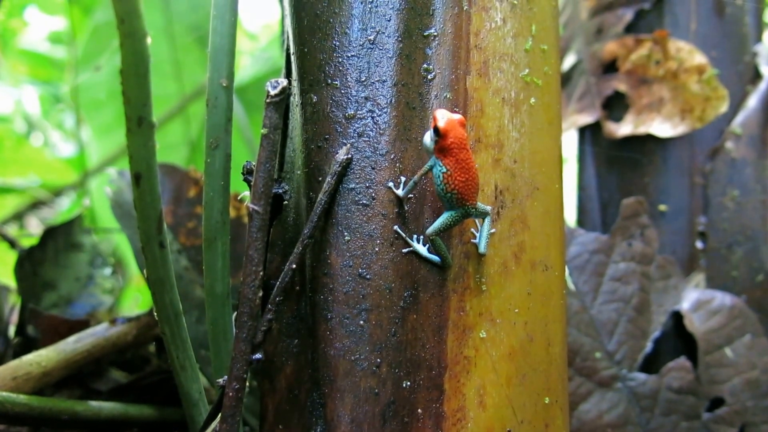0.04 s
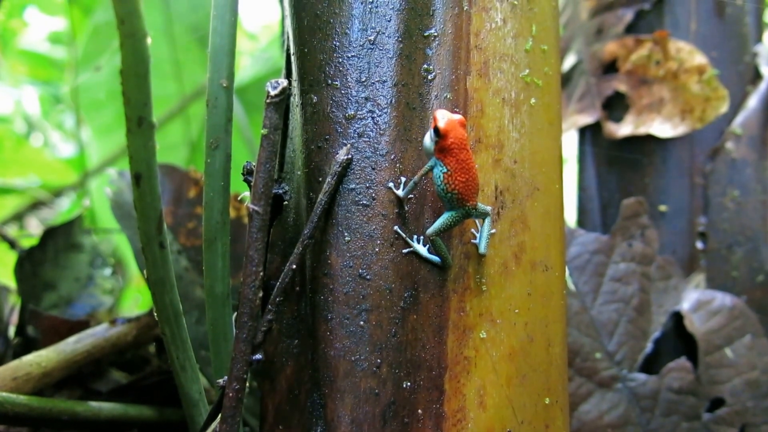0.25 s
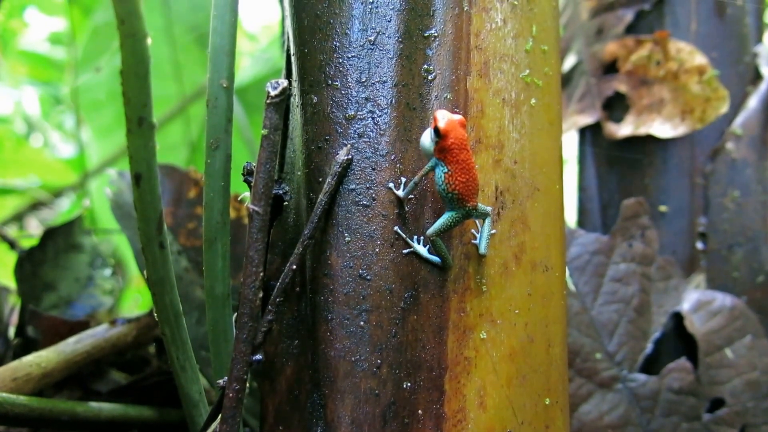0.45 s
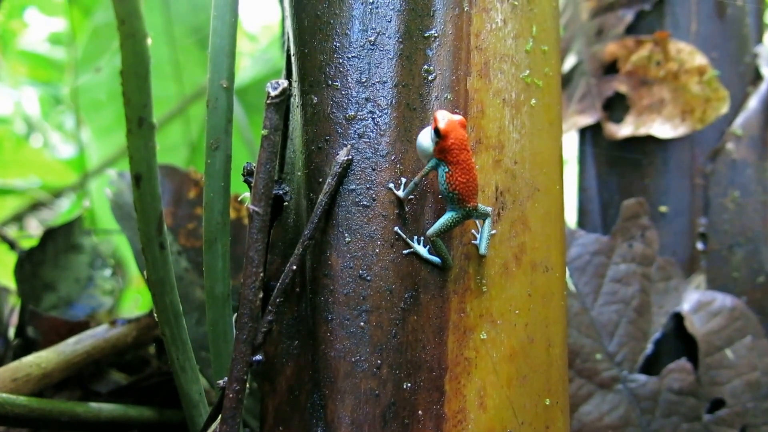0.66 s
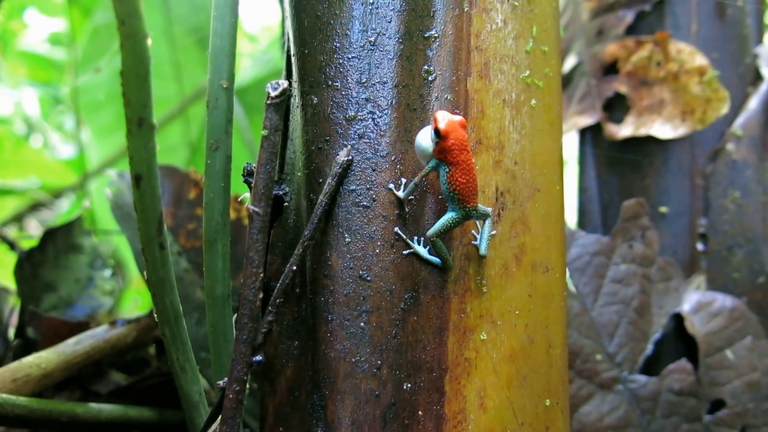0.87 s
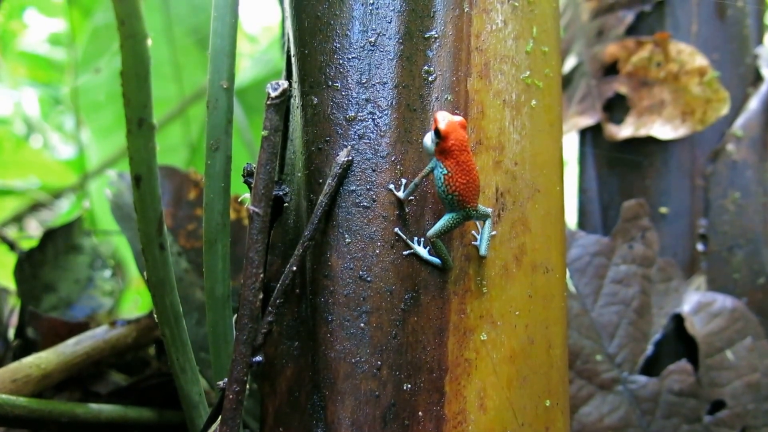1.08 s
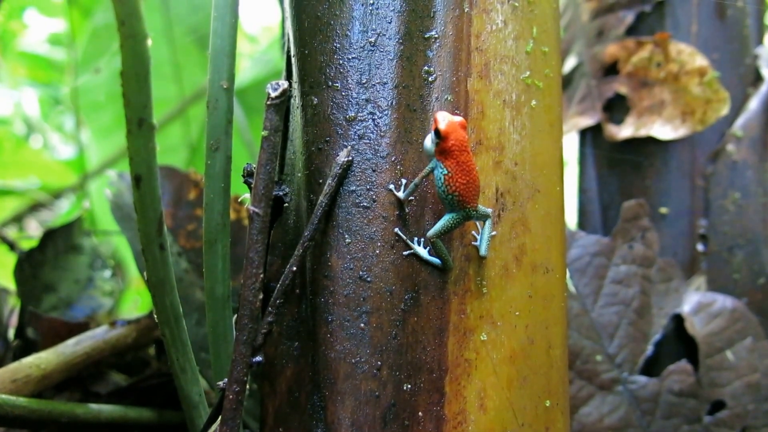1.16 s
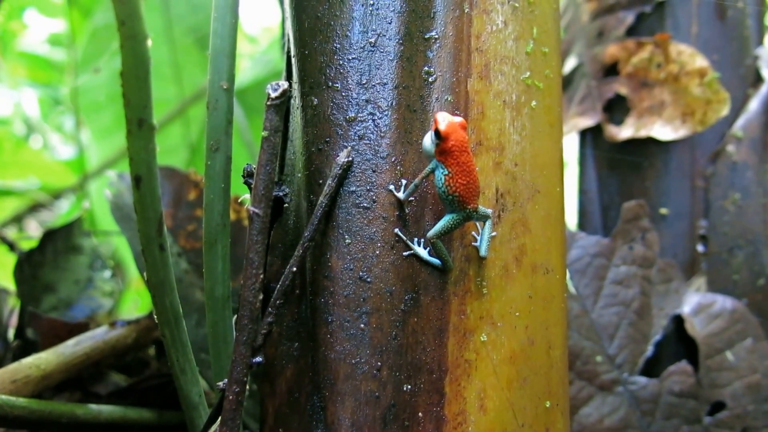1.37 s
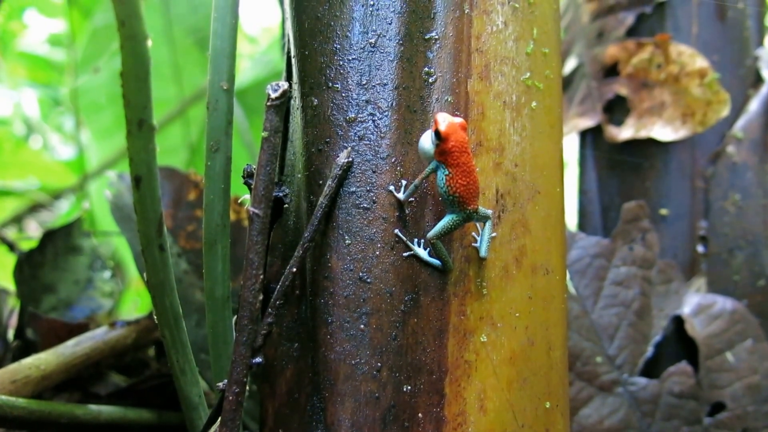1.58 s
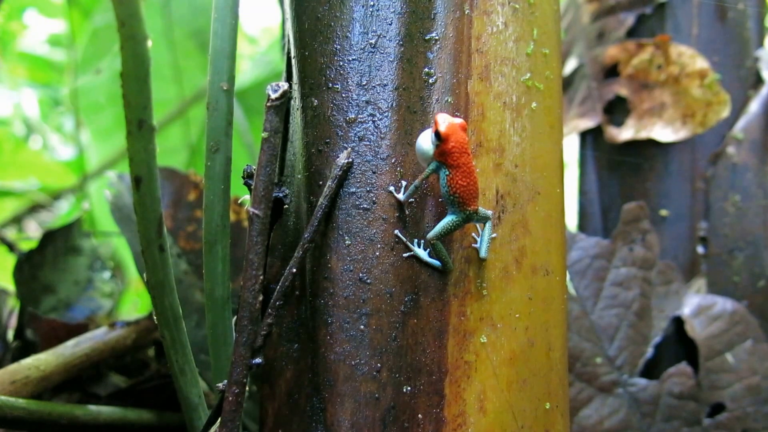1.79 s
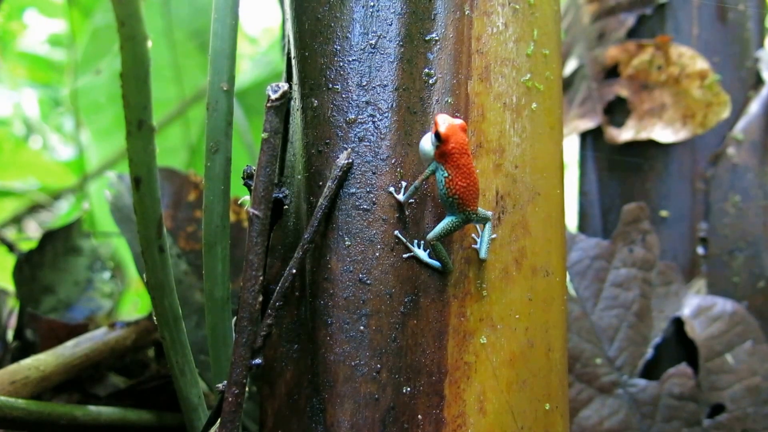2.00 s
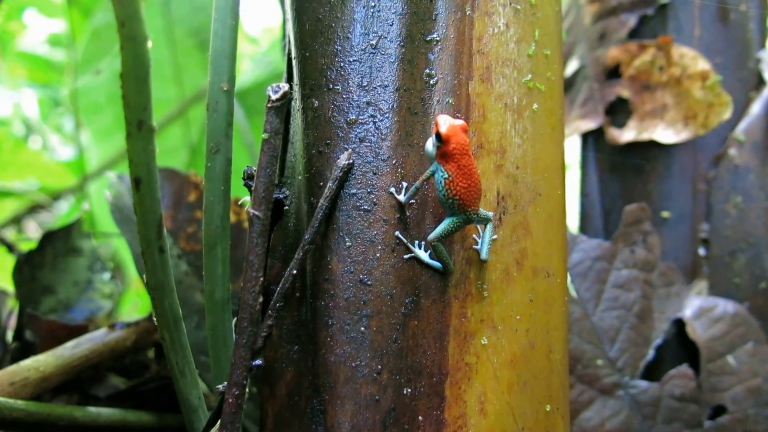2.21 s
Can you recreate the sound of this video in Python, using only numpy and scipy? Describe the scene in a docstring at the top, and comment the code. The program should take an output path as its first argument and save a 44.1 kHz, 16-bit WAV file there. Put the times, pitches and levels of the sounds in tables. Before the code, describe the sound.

A small frog trills close by, from about 0.2 to 0.9 seconds. The call opens with a few soft ticks, quickens into a high buzz that grows louder and rises in pitch, then ends in a brief flutter. After a pause, a nearly identical trill runs from about 1.3 to 1.9 seconds. A soft, steady wash of distant forest noise lies underneath throughout.

```python
"""In a forest, a small frog on a plant stem gives two buzzy trills over a steady, distant wash.
Each trill is about ninety snaps of the larynx that ring the vocal sac; as the sac fills, the ring
grows louder, higher and longer. Leaves scatter faint echoes around the frog, and an automatic
gain control ducks the mix on the loudest snaps, so the wash dips and creeps back."""
import sys
import numpy as np
from scipy import signal
from scipy.io import wavfile
from scipy.ndimage import uniform_filter1d

SR = 44100
rng = np.random.default_rng(int(sys.argv[2]) if len(sys.argv) > 2 else 0)


def log_audio(samples):
    """Write samples as a 16-bit WAV file to the path given in sys.argv[1]."""
    # one column per channel
    frames = np.atleast_2d(samples).T
    # limit to full scale, then quantise
    limited = np.clip(frames, -1, 1)
    pcm = np.round(limited * 32767).astype(np.int16)
    wavfile.write(sys.argv[1], SR, pcm)


N = 99225

# tone of the forest bed (frequency [Hz], relative level [dB])
WASH_EQ = [(25, -44), (45, -58), (80, -9.5), (130, -2), (180, -0.4), (240, -3), (400, 0.9), (540, 0.84),
           (850, -2.5), (1200, -5), (1750, -5.5), (2250, -9.5), (2850, -14.5), (4300, -14.5), (6000, -15.5),
           (7200, -19), (11000, -21), (14300, -24), (15600, -26.5)]
# how mono the bed is (frequency [Hz], left-right correlation [0-1])
WASH_MONO = [(30, .8), (80, 0.92), (290, 0.95), (640, 0.84), (1410, 0.55), (3100, 0.67), (6800, 0.27),
             (15000, .04)]
# lean of the bed (frequency [Hz], left minus right [dB])
WASH_PAN = [(60, -2), (250, 1.1), (640, 0.9), (1400, 2.5), (3100, 1), (6500, -1), (9000, -1.5), (11000, -1),
            (12500, -3), (14300, 7), (15600, -3)]
# slap off the nearest leaf (delay [s], level [dB])
LEAF_ECHOES = [(.0049, -19)]
# pace of each trill: slow ticks, buzz, slackening, last flutter (time [s], rate [snaps/s])
RATE_1 = [(0.208, 42), (0.234, 38), (0.281, 133), (0.33, 141), (0.37, 163), (0.41, 149), (0.511, 164),
          (0.538, 181), (0.618, 158), (0.754, 143), (0.842, 103), (0.864, 262)]
RATE_2 = [(1.255, 47), (1.285, 40), (1.301, 88), (1.382, 146), (1.42, 151), (1.467, 148), (1.525, 162),
          (1.619, 173), (1.659, 158), (1.797, 140), (1.894, 105), (1.917, 257)]
# the two calls (rate curve [table], trim [dB], ring pitch shift [Hz])
TRILLS = [(RATE_1, -1.4, 0), (RATE_2, -1.1, 40)]
# swell and rise of a trill (time since first snap [s], effort [dB], ring pitch [Hz])
TRILL_SHAPE = [(0, -12.5, 3280), (.06, -11, 3340), (.17, -5.5, 3490), (.27, -2, 3670), (.345, -0.75, 3856),
               (.45, 1.92, 3986), (.6, 3, 4150), (.66, 2.5, 4140)]
# tone of throat and body (frequency [Hz], gain [dB])
BODY_EQ = [(500, -28), (2400, -15), (2900, -9), (3250, -1), (3500, 1), (3800, .6), (4200, 0), (4550, -1.5),
           (5100, -4.5), (5700, 2.2), (6100, -7), (6600, -1.8), (7200, -4), (8000, -1), (9500, -6.5),
           (12000, -10.5), (16000, -16)]
# placement of the frog (frequency [Hz], left minus right [dB])
FROG_PAN = [(3000, -10), (4000, 4.5), (4700, -4), (5600, 1.5), (6400, -7), (8000, -3), (10700, -9),
            (13000, -28)]

WASH_DB, PATCH_DB = -26.5, 0.86
LEAVES_DB, LEAVES_T60_S, LEAVES_DELAY_S = -14.5, .06, .0015
SNAP_T60_S, FILL_S = 0.0057, 0.41  # decay of a snap; time for the sac to fill
SOFT_ONSET_S, EASE_S = 0.00012, .08  # softer attacks until the sac is full, and as the frog eases off
HUM_DB, HUM_SPREAD_DB, HUM_S = -11, -2, .0044  # the taut sac hums on after a snap
SLACK_DB_PER_S = 61  # the hum fades as the sac slackens
OVERTONE_HZ, OVERTONE_FOLLOW = 9650, 1.7  # starting pitch; Hz gained per Hz that the ring rises
OVERTONE_DB, OVERTONE_T60_S, OVERTONE_GROWTH = -26, 0.011, 0.34  # growth: dB per dB of effort
CLOSE_S, CLOSE_DB = 0.039, -12  # the last snaps fade
JITTER_DB, JITTER_HZ, JITTER_S = 0.49, 24.3, .00006  # from snap to snap
THRESHOLD_DB, RECOVER_DB_PER_S, START_DUCK_DB, DUCK_S = -4, 4, 3, 0.014
HIGH_CUT_HZ = 15700
RING_T = np.arange(900) / SR  # time axis of one snap


def amp(db):
    """Decibels to gain."""
    return 10 ** (np.asarray(db) / 20)


def unit(x):
    """Scales to rms 1."""
    return x / np.sqrt(np.mean(x ** 2) + 1e-20)


def curve(points, hz):
    """Reads a spectrum table on a log-frequency axis."""
    f, value = np.transpose(points)
    return np.interp(np.log(hz + 1), np.log(f + 1), value)


def add(mix, s, sound):
    """Mixes a sound in at s seconds."""
    part = mix[max(round(s * SR), 0):][:len(sound)]
    part += sound[:len(part)]


def equalise(x, gain_db, size=2048):
    """Minimum-phase EQ whose gain in dB is a function of frequency."""
    log_gain = np.log(amp(gain_db(abs(np.fft.fftfreq(size, 1 / SR)))))
    taps = np.fft.ifft(np.exp(np.conj(signal.hilbert(log_gain)))).real
    return signal.oaconvolve(x, taps[:size // 2])[:N]


def forest_wash():
    """Distant forest noise with faint drifting patches, near mono in the bass and wide in the treble."""
    frames, hz = N // 256 + 5, np.fft.rfftfreq(1024, 1 / SR)
    a, b, c, d, patches = rng.standard_normal((5, frames, len(hz)))
    patches = uniform_filter1d(patches, size=14, axis=0)  # smooth in time
    patches = unit(uniform_filter1d(patches, size=12, axis=1))  # and in frequency
    mono = curve(WASH_MONO, hz)
    left = a + 1j * b
    right = mono * left + np.sqrt(1 - mono ** 2) * (c + 1j * d)
    pan = amp(curve(WASH_PAN, hz) / 2)
    spectra = np.array([left * pan, right / pan]) * amp(curve(WASH_EQ, hz) + PATCH_DB * patches)
    noise = signal.istft(spectra.transpose(0, 2, 1), nperseg=1024, noverlap=768)[1][:, :N]
    return amp(WASH_DB) * unit(noise)


def leaf_scatter(x, size=6000):
    """Leaves add one close slap and a short diffuse tail that differs in each ear."""
    t = np.arange(size) / SR
    tail = rng.standard_normal((2, size)) * np.exp(-np.log(1000) * t / LEAVES_T60_S)
    tail *= t > LEAVES_DELAY_S
    taps = amp(LEAVES_DB) * tail / np.linalg.norm(tail, axis=1, keepdims=True)
    taps[:, 0] += 1  # direct sound
    for delay, db in LEAF_ECHOES:
        taps += amp(db) * np.sinc((t - delay) * SR)
    return signal.fftconvolve(x, taps, axes=1)[:, :N]


def ring(hz, t60):
    """One struck mode, dying by 60 dB in t60 seconds."""
    return np.sin(2 * np.pi * hz * RING_T) * np.exp(-np.log(1000) * RING_T / t60)


def sac_hum(hz):
    """The taut sac hums in a brief swell that lengthens the ring."""
    swell = np.hanning(int(HUM_S * SR))
    return np.pad(swell, (0, len(RING_T) - len(swell))) * np.sin(2 * np.pi * hz * RING_T)


def trill(rate, trim_db, shift_hz):
    """A train of larynx snaps; each sets off the sac's ring, its hum and a faint overtone."""
    at, per_s = np.transpose(rate)
    t = np.arange(at[0], at[-1], 1 / SR)
    count = np.cumsum(np.interp(t, at, per_s)) / SR
    times = np.interp(np.arange(int(count[-1]) + 1), count, t)  # one snap per whole count
    age, effort, pitch = np.transpose(TRILL_SHAPE)
    out = np.zeros(N)
    for s in times:
        effort_draw, pitch_draw, hum_draw, time_draw = rng.standard_normal(4)
        since, remaining = s - at[0], at[-1] - s
        effort_db = np.interp(since, age, effort) + JITTER_DB * effort_draw
        hz = np.interp(since, age, pitch) + shift_hz + JITTER_HZ * pitch_draw
        fullness = min(since / FILL_S, 1) ** 3
        slack_db = SLACK_DB_PER_S * max(since - FILL_S, 0)
        hum = fullness * amp(HUM_DB - slack_db + HUM_SPREAD_DB * hum_draw) * sac_hum(hz)
        softness = max(1 - fullness, 1 - remaining / EASE_S)
        attack = 1 - np.exp(-RING_T / (SOFT_ONSET_S * softness + 1e-9))
        snap = amp(effort_db) * (attack * ring(hz, SNAP_T60_S) + hum)
        overtone_hz = OVERTONE_HZ + OVERTONE_FOLLOW * (hz - pitch[0])
        snap -= amp(OVERTONE_DB + OVERTONE_GROWTH * effort_db) * ring(overtone_hz, OVERTONE_T60_S)
        closing = max(1 - remaining / CLOSE_S, 0) ** 2
        add(out, s + JITTER_S * time_draw, amp(trim_db + CLOSE_DB * closing) * snap)
    return out


def frog():
    """Both trills, coloured by the body and by the path to each ear."""
    sac = sum(trill(*row) for row in TRILLS)
    return np.array([equalise(sac, lambda hz: curve(BODY_EQ, hz) + side * curve(FROG_PAN, hz))
                     for side in (.5, -.5)])


def scene():
    """The frog among leaves, over the forest wash."""
    return leaf_scatter(frog()) + forest_wash()


def record(dry):
    """Gain control, already ducked at first, rides the peaks with a slow release; then a high cut."""
    over_db = 20 * np.log10(abs(dry).max(0) + 1e-9) - THRESHOLD_DB
    release_db = RECOVER_DB_PER_S * np.arange(N) / SR
    held_db = np.maximum.accumulate(np.maximum(over_db + release_db, START_DUCK_DB))
    duck_db = np.maximum(held_db - release_db, 0)
    ducked = dry / amp(uniform_filter1d(duck_db, int(DUCK_S * SR)))
    high_cut = signal.firwin(511, HIGH_CUT_HZ, window=("kaiser", 9), fs=SR)
    return signal.oaconvolve(ducked, high_cut[None], "same")


dry = scene()
out = record(dry)
log_audio(out)
```